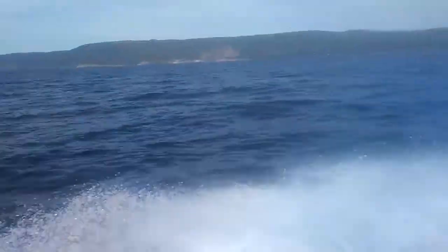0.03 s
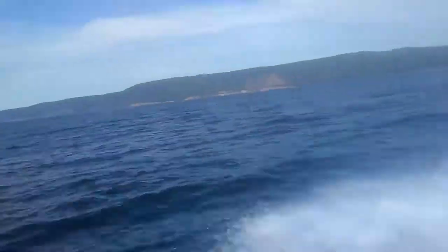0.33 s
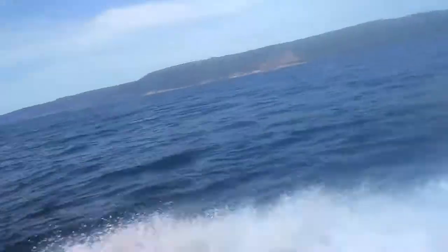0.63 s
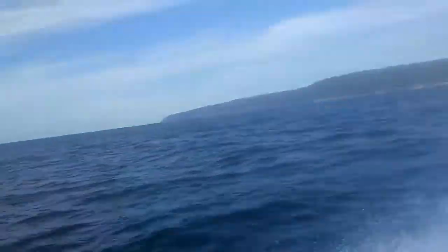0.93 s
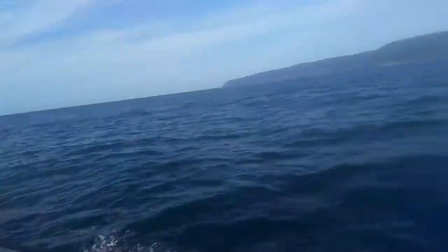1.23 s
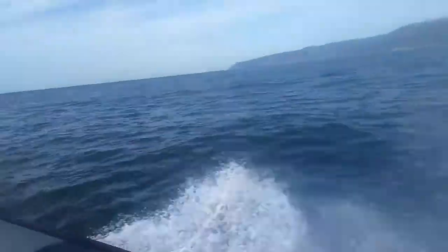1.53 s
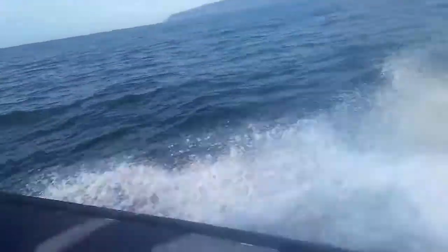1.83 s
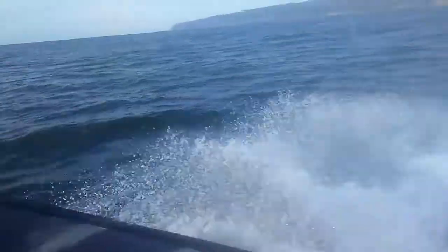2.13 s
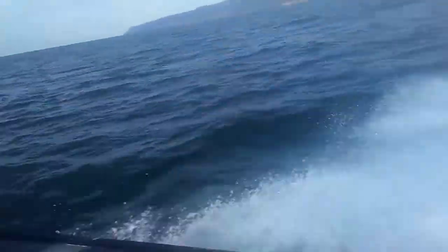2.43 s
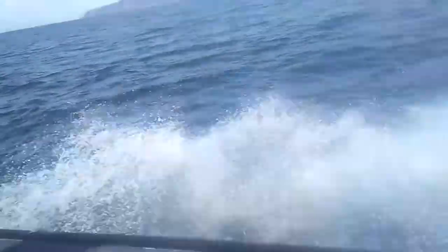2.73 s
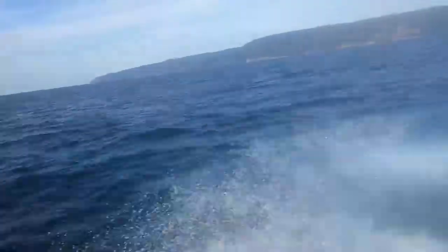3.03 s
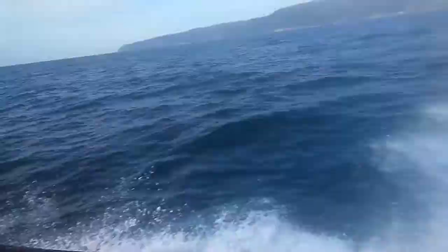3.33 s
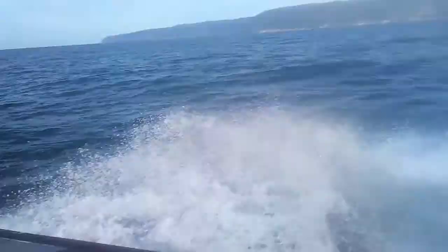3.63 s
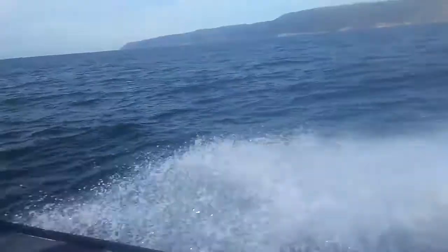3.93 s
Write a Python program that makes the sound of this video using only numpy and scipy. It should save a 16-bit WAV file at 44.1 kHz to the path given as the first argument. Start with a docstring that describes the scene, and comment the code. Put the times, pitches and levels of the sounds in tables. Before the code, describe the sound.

A motorboat drones at a steady pitch throughout, heard from on board with a booming hull, rushing water and hissing, pattering spray. Wind gusts buffet and rasp on the microphone from about 0.3 to 2.2 seconds, choking it for an instant near 1 and 1.5 seconds. Spray swells around 2.5 and 2.9 seconds. Gusts return from 3.4 seconds with a low thud of air.

```python
"""A motorboat's motor drones at steady revs, heard from on board on a fast run over a choppy sea.
Its tones are multiples of the shaft speed. Around it the hull booms, water rushes along the side
and sheets of spray hiss over the boat, a mix of noise and pattering droplets. Gusts buffet the
one microphone, push its limiter down and, at their hardest, choke it for an instant."""
import sys
import numpy as np
from scipy import signal
from scipy.fft import rfft, irfft, next_fast_len
from scipy.io import wavfile
from scipy.ndimage import uniform_filter1d, minimum_filter1d, map_coordinates

SR = 44100
rng = np.random.default_rng(int(sys.argv[2]) if len(sys.argv) > 2 else 0)


def master(y):
    """Save y as 16-bit WAV."""
    cut = np.clip(np.atleast_2d(y).T, -1, 1)
    pcm = np.round(cut * 32767)  # scale
    wavfile.write(sys.argv[1], SR, pcm.astype(np.int16))


N = 176400  # 4 s


def amp(db):
    """Decibels to gain."""
    return 10 ** (np.asarray(db) / 20)


def unit(x):
    """Scale to rms 1."""
    return x / np.sqrt(np.mean(x ** 2) + 1e-20)


def curves(rows):
    """One value per sample for each column after the time."""
    times, *columns = np.transpose(rows)
    return [np.interp(np.arange(N) / SR, times, column) for column in columns]


def wobble(rate):
    """A smooth random curve, rate knots a second."""
    knots = rng.standard_normal(int(N * rate / SR) + 4)
    return map_coordinates(knots, [np.arange(N) * rate / SR], mode="nearest")


def swells(rows):
    """A sum of bell-shaped envelopes, one per row of peak t/s, length/s, level/dB."""
    t = np.arange(N) / SR
    return sum(amp(db) * np.exp(-2 * ((t - peak) / length) ** 2) for peak, length, db in rows)


def filtered(x, response):
    """x through a gain that is a function of frequency."""
    size = next_fast_len(N + SR // 4)
    return irfft(rfft(x, size) * response(np.fft.rfftfreq(size, 1 / SR)), size)[:N]


def equalised(x, points):
    """x through a curve of f/Hz, gain/dB points, joined on a log frequency axis."""
    freqs, db = np.transpose(points)
    return filtered(x, lambda hz: amp(np.interp(np.log(hz + 1), np.log(freqs + 1), db)))


def noise(spectrum):
    """Coloured noise of rms 1."""
    return unit(equalised(rng.standard_normal(N), spectrum))


def limiter(x, ceiling, look_s=0.001, release_s=0.011):
    """Peaks over the ceiling pull the gain down at once; it recovers within milliseconds."""
    window = int(look_s * SR)
    excess = -np.log(minimum_filter1d(ceiling / np.maximum(np.abs(x), ceiling), window))
    leak = np.arange(N) / (release_s * SR)
    reduction = np.exp(np.maximum.accumulate(np.log(excess + 1e-9) + leak) - leak)
    return x * np.exp(-uniform_filter1d(reduction, window))


# Moments when wind chokes the microphone: start t/s, length/s, gain above the bass/dB
CHOKES = [(1.038, 0.0064, -27.5), (1.05, .003, -19), (1.488, 0.0079, -25), (1.541, .006, -22),
          (1.559, 0.025, -45)]

def choke(x, edge_s=0.0026, pass_hz=130):
    """The overloaded microphone passes only a little bass for a few milliseconds."""
    t = np.arange(N) / SR
    shut_db = np.zeros(N)
    for start, length, db in CHOKES:
        inside_s = np.minimum(t - start, start + length - t)
        shut_db += db * np.clip(inside_s / edge_s + 0.5, 0, 1)
    bass = filtered(x, lambda hz: 1 / (1 + (hz / pass_hz) ** 6))
    return (x - bass) * amp(shut_db) + bass * amp(0.16 * shut_db)


# Gusts right on the microphone: peak t/s, length/s, low buffet level/dB, harsh rasp level/dB
GUSTS = [(0.334, 0.057, -13, -18), (.425, 0.033, -13, -25), (.515, 0.038, -16.5, -18),
         (0.725, 0.013, -11, -5), (0.763, 0.019, -13, -14.5), (0.822, 0.017, -8, -5.5),
         (1.068, .018, -11, -6.5), (1.158, 0.026, -4.5, -11), (1.31, 0.079, -11, -22),
         (1.363, 0.032, -13, -8.5), (1.409, 0.021, -11.5, -5), (1.528, 0.0073, -7, -1),
         (1.656, 0.1, -19.5, -26), (1.858, 0.033, -11, -14), (2.207, 0.019, -11.5, -9),
         (2.70, 0.026, -18.5, -22), (3.41, 0.037, -12.5, -18), (3.593, 0.047, -15, -18),
         (3.713, 0.034, -12, -34), (3.797, .02, -11, -11)]
# Low thuds of air on the microphone: peak t/s, length/s, level/dB
THUDS = [(.8, .06, -28), (1.52, 0.032, -29), (2.2, .04, -32), (3.425, .025, -18), (3.78, .05, -26)]
# Spectra of the buffet, the rasp and the thuds: f/Hz, relative level/dB
BUFFET_SPECTRUM = [(20, -28), (60, -11), (120, -18.5), (170, -2.5), (280, 5.5), (430, -0.5), (650, -10),
                   (1100, -19.5), (4000, -43)]
RASP_SPECTRUM = [(100, -34), (350, -6), (600, 2.5), (900, -2), (1300, -7), (2000, -12), (4000, -24),
                 (10000, -54)]
THUD_SPECTRUM = [(15, -15), (45, -7), (90, -18), (200, -14), (1000, -60)]

def wind(breeze_db=-25.5, push_db=-8, blast_lead_s=0.0029, blast_s=0.0023, blast_db=-4.5):
    """At the microphone, gusts buffet and rasp over a steady breeze; a blast leads into each choke."""
    low = swells([(peak, length, db) for peak, length, db, _ in GUSTS])
    harsh = swells([(peak, length, db) for peak, length, _, db in GUSTS])
    blasts = swells([(start - blast_lead_s, blast_s, blast_db) for start, _, _ in CHOKES])
    buffet = unit(amp(2 * wobble(rate=140)) * noise(BUFFET_SPECTRUM))
    rasp = unit(amp(5 * wobble(rate=200)) * noise(RASP_SPECTRUM))
    push = amp(push_db) * harsh  # one-sided air pressure that loads the limiter
    thuds = swells(THUDS) * noise(THUD_SPECTRUM)
    return (amp(breeze_db) + low) * buffet + (harsh + blasts) * rasp + push + thuds


# Boom of the hull, from on board: f/Hz, relative level/dB
HULL_SPECTRUM = [(20, -35), (40, -22), (60, -9.5), (80, -7), (100, -7.5), (122, -36), (145, -12.5),
                 (166, 7.5), (188, -4), (235, -3.5), (330, 0), (430, 1.5), (520, -5.5), (620, -14.5),
                 (900, -10.5), (2000, -32)]

def hull(level_db=-18):
    """The hull underfoot booms under motor and waves."""
    return amp(level_db + 0.4 * wobble(rate=13)) * noise(HULL_SPECTRUM)


def patchy(x, depth_db=0.78, patch_hz=600, patch_s=0.11):
    """x with drifting patches of louder and softer colour."""
    frame, hop = 512, 256
    spectrogram = signal.stft(x, nperseg=frame)[2]
    patches = rng.standard_normal(spectrogram.shape)
    patches = uniform_filter1d(patches, int(patch_hz * frame / SR), axis=0)
    patches = uniform_filter1d(patches, int(patch_s * SR / hop), axis=1)
    return signal.istft(spectrogram * amp(depth_db * unit(patches)), nperseg=frame)[1][:N]


def water(spectrum, drops_per_s=2100, patter_db=-10.5, spread_db=8.5):
    """Patchy rushing noise with a dense patter of droplets of uneven size, at rms 1."""
    hits = rng.random(N) < drops_per_s / SR
    sizes = amp(spread_db * np.minimum(rng.exponential(size=N), 5))
    signs = np.sign(rng.standard_normal(N))
    patter = amp(patter_db) * unit(hits * sizes * signs)
    flow = patchy(rng.standard_normal(N))
    return unit(equalised(flow + patter, spectrum))


# The wash at the microphone, swelling with the water and ducking under gusts, in consecutive blocks:
# t/s, relative level/dB of rush, spray and mist
WASH_LEVELS = [
    [(0.0, -16.5, -27.5, -35.5), (0.568, -21, -29.5, -36), (0.654, -18.5, -34, -35), (0.76, -28, -35, -48),
     (0.798, -20.5, -30, -37), (0.834, -28, -42, -53), (0.858, -23, -30, -47), (1.03, -19.5, -25, -39),
     (1.04, -16.5, -30, -34), (1.06, -21, -26, -40), (1.15, -21, -26.5, -35), (1.158, -28, -31, -50),
     (1.206, -18.5, -26, -36), (1.292, -22.5, -28, -48), (1.408, -25, -36, -50), (1.452, -21, -31, -33),
     (1.47, -21.5, -28, -35)],
    [(1.63, -25.5, -34, -45), (1.75, -25, -36, -40), (1.78, -23, -31, -35.5), (2.12, -21, -29, -28.5),
     (2.21, -27, -35, -35), (2.24, -23, -38, -31.5), (2.52, -17.5, -26, -29), (2.69, -22, -32, -31),
     (2.72, -24.5, -38, -38), (2.88, -19.5, -24.5, -25.5), (3.09, -24, -35.5, -35),
     (3.11, -19.5, -31.5, -31), (3.27, -20.5, -27.5, -29), (3.77, -23, -37, -35), (3.88, -19, -26, -29),
     (3.97, -22, -33.5, -31), (4.0, -22, -35, -31)],
]
# Rush alongside, with a faint top-treble fizz added by the recorder: f/Hz, relative level/dB
RUSH_SPECTRUM = [(200, -23), (600, -3), (1000, -0.5), (1500, 1.5), (2200, 1.5), (3000, 3.5), (3800, 3.5),
                 (5600, -7.5), (6400, -8.5), (8000, -22.5), (12500, -24.5), (14000, -19), (15600, -21)]
# Spray over the boat and its finest mist: f/Hz, relative level/dB
SPRAY_SPECTRUM = [(3000, -40), (5500, -22), (6400, -7), (7100, 3), (8600, 2), (9800, -8), (12000, -25),
                  (16000, -38)]
MIST_SPECTRUM = [(5000, -38), (8300, -2), (9700, 0), (11500, -4), (13000, -13.5), (15600, -25)]

def wash():
    """Close by, rush, spray and mist swell with the water and duck under gusts, sharing one churn."""
    rush_db, spray_db, mist_db = curves(np.vstack(WASH_LEVELS))
    churn_db = 0.51 * wobble(rate=21.99)
    rush = amp(rush_db + 6) * water(RUSH_SPECTRUM)
    spray = amp(spray_db + 1) * water(SPRAY_SPECTRUM)
    mist = amp(mist_db + 1.5) * water(MIST_SPECTRUM)
    return amp(churn_db) * (rush + spray + mist)


# Turning rate of the motor shaft: t/s, f/Hz
SHAFT_SPEED = [(0.0, 76.6), (0.75, 76.2), (0.78, 77.2), (1.54, 76.3), (3.89, 76.5), (4.0, 75.7)]
# The motor's weaker tones: multiple of the shaft speed, relative level/dB
WEAK_TONES = [(1, -17), (2, -21.5), (3, -13.5), (4, -11.5), (7, -14.5), (8, -27.5), (10, -15.5), (12, -25),
              (14, -21), (22, -26)]
# The two drone tones swell and fade at the microphone: t/s, fifth and sixth multiple relative level/dB
DRONE_LEVELS = [(0.0, -17.5, -15.5), (0.15, -20, -14.5), (0.18, -22, -14), (0.76, -17.5, -20),
                (0.98, -14.5, -11), (1.12, -17, -16), (1.17, -32, -15.5), (1.21, -17, -13),
                (1.53, -12, -22), (1.57, -20, -28), (1.6, -16, -21.5), (1.73, -14, -14.5), (1.77, -30, -17),
                (1.94, -12.5, -17.5), (2.17, -17.5, -15.5), (2.21, -26, -24), (2.27, -18, -17),
                (2.88, -28.5, -15), (2.97, -16, -12.5), (3.4, -17.5, -17.5), (3.68, -16, -19),
                (3.72, -26, -18.5), (3.79, -17.5, -19.5), (4.0, -19, -16)]

def motor(weak_db=-13, speed_jitter=0.0015, waver_db=1, waver_rad=0.07, wavers_per_s=7.6):
    """The motor, within a boat's length: tones locked to the shaft, wavering in level and phase."""
    shaft_hz, = curves(SHAFT_SPEED)
    fifth_db, sixth_db = curves(DRONE_LEVELS)
    shaft_angle = 2 * np.pi * np.cumsum(shaft_hz * (1 + speed_jitter * wobble(rate=14))) / SR
    tones = [(multiple, weak_db + db) for multiple, db in WEAK_TONES]
    tones += [(5, fifth_db + 0.5), (6, sixth_db + 2)]
    drone = np.zeros(N)
    for multiple, db in tones:
        rms = amp(db + waver_db * wobble(wavers_per_s))
        phase = waver_rad * wobble(wavers_per_s) + rng.uniform(0, 2 * np.pi)
        drone += np.sqrt(2) * rms * np.sin(multiple * shaft_angle + phase)
    return drone


def scene():
    """Everything reaches one microphone on board, the same in both channels."""
    return np.tile(motor() + hull() + wash() + wind(), (2, 1))


# The microphone's response, with a deep notch in the treble: f/Hz, gain/dB
MIC_RESPONSE = [(3950, 1), (4120, -6), (4300, -13.5), (4400, -31), (4750, -35), (5100, -19.5), (5600, -7),
                (6400, -3), (7000, 2.5)]

def record(dry, low_cut_hz=32, top_hz=15800):
    """The mono microphone chain: input limiter, low cut, choking, notch, output limiter, band limit."""
    x = limiter(dry[0], ceiling=1.0)
    x = filtered(x, lambda hz: 1 - 1 / (1 + (hz / low_cut_hz) ** 4))
    x = equalised(choke(x), MIC_RESPONSE)
    x = limiter(x, ceiling=0.95)
    x = filtered(x, lambda hz: hz < top_hz)
    return np.tile(x, (2, 1))


dry = scene()
out = record(dry)
master(out)
```